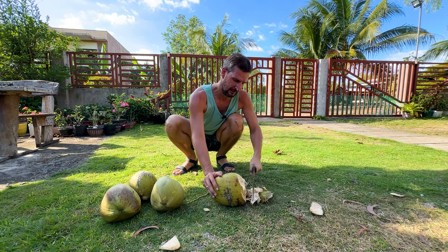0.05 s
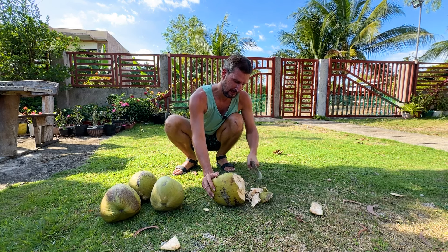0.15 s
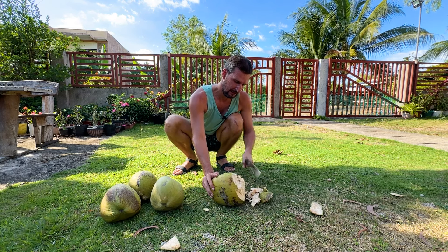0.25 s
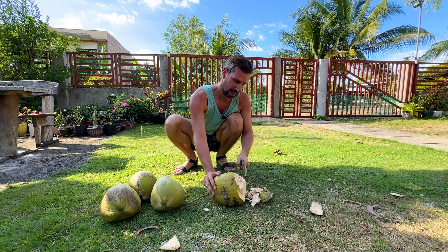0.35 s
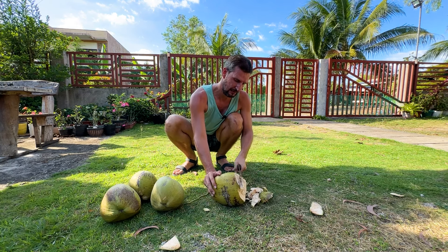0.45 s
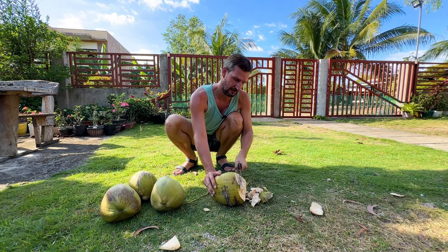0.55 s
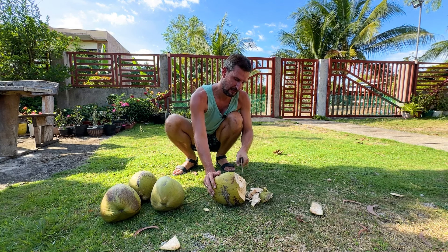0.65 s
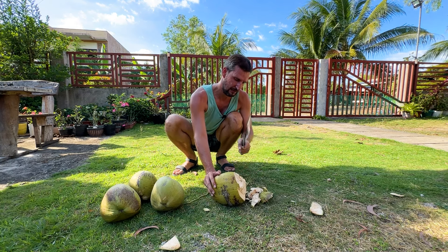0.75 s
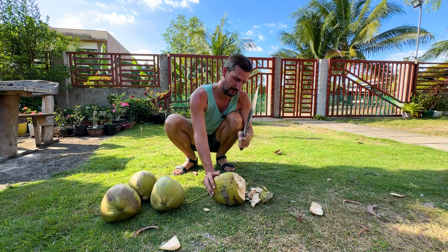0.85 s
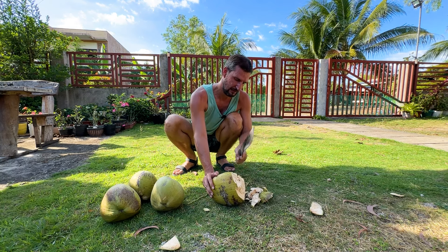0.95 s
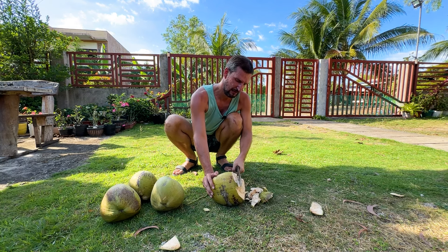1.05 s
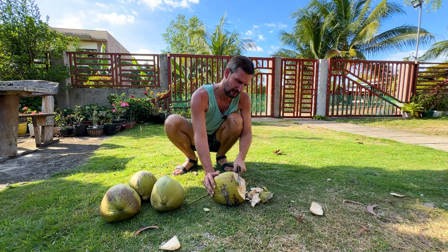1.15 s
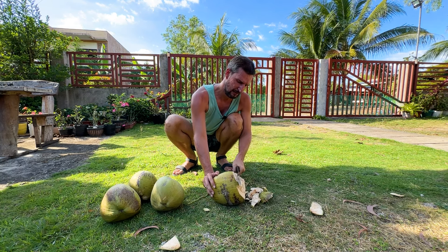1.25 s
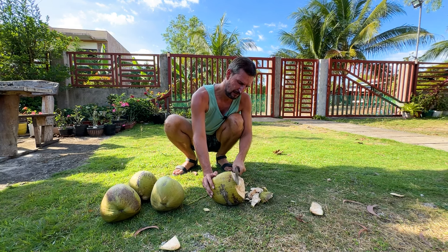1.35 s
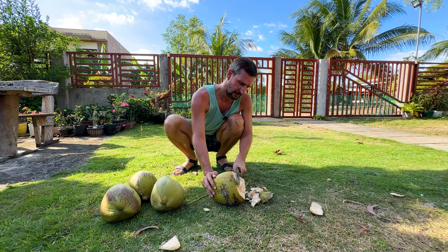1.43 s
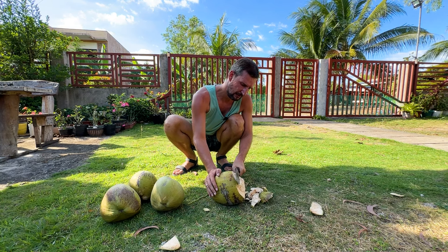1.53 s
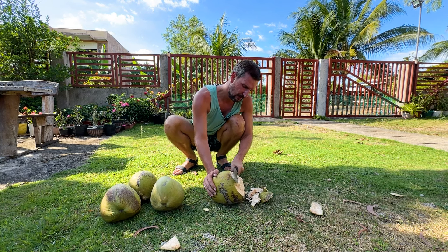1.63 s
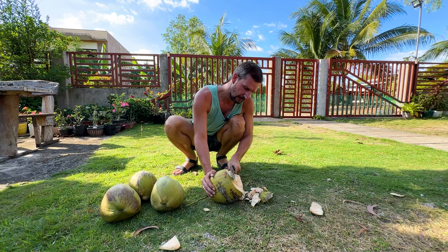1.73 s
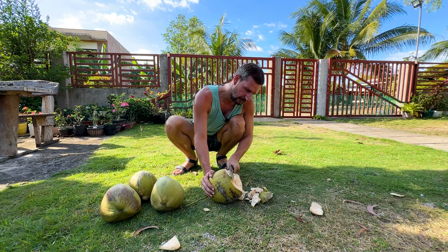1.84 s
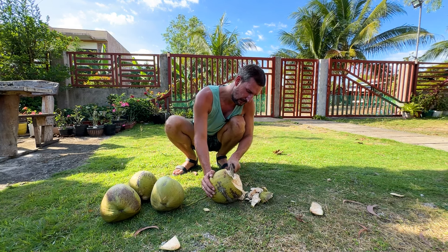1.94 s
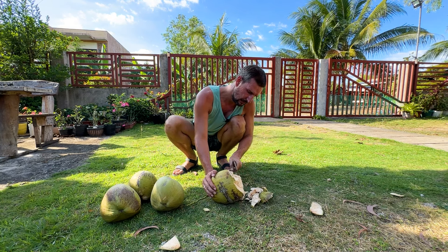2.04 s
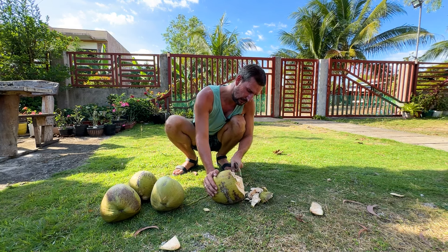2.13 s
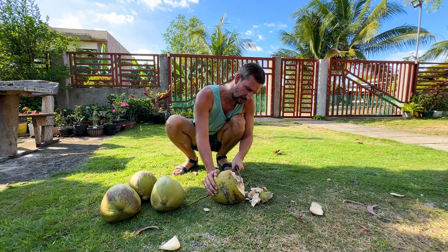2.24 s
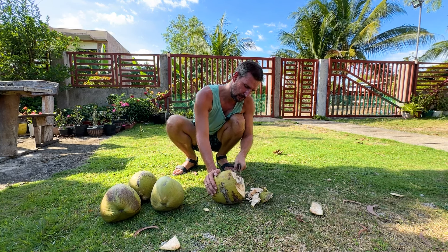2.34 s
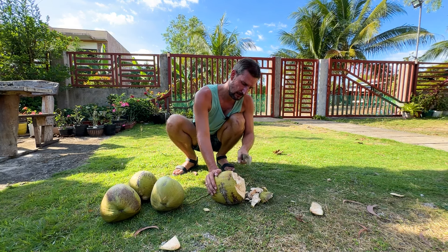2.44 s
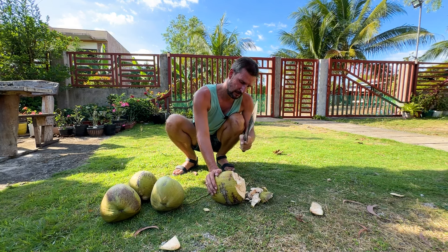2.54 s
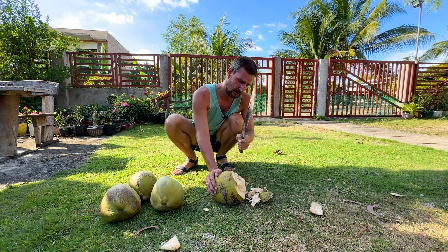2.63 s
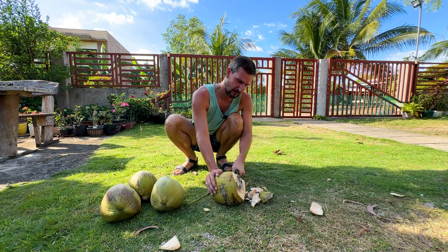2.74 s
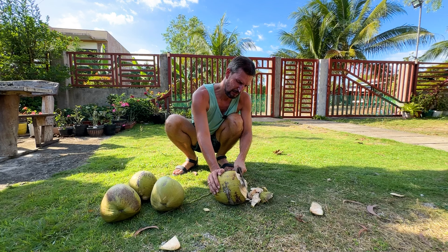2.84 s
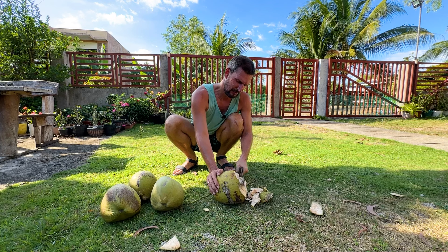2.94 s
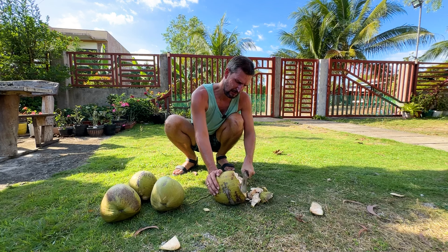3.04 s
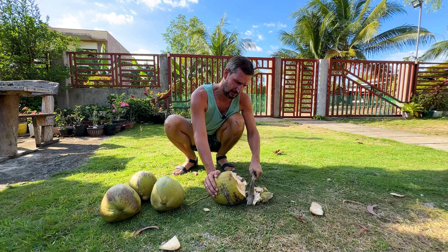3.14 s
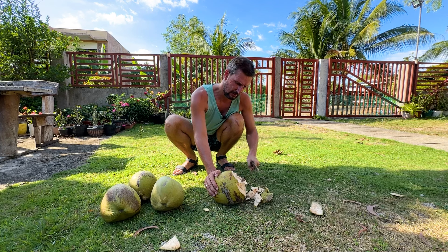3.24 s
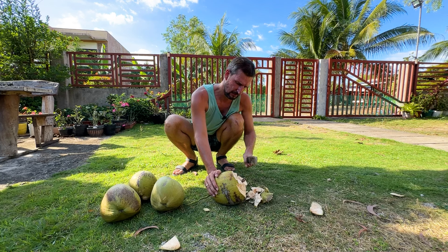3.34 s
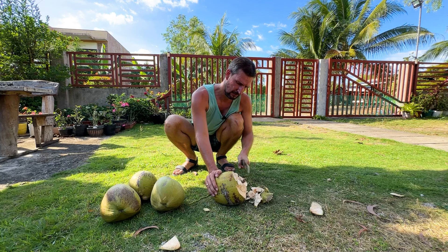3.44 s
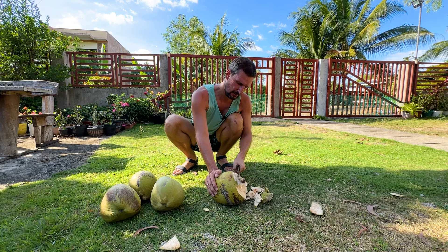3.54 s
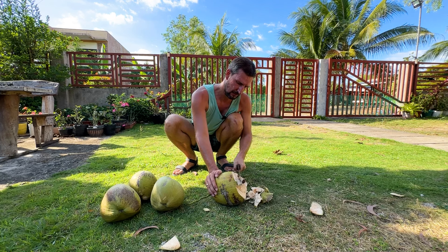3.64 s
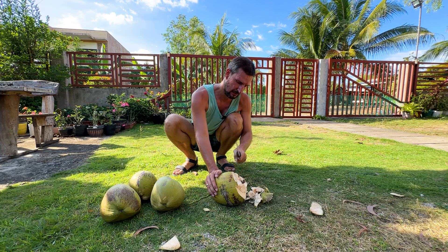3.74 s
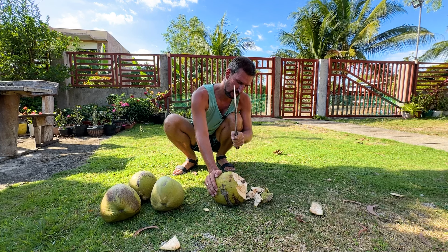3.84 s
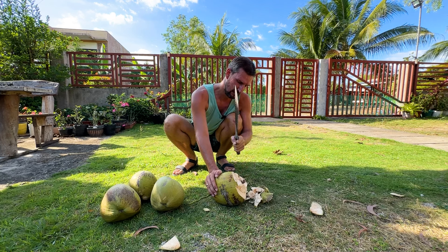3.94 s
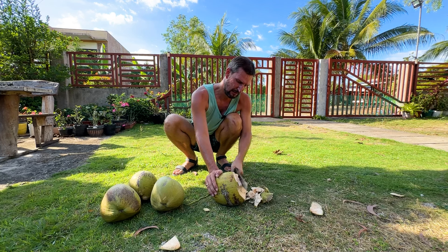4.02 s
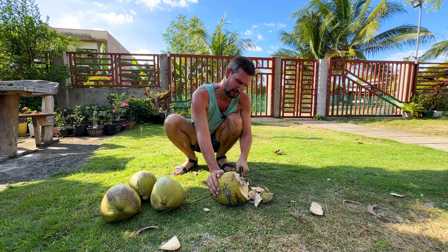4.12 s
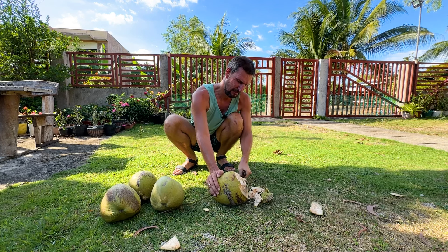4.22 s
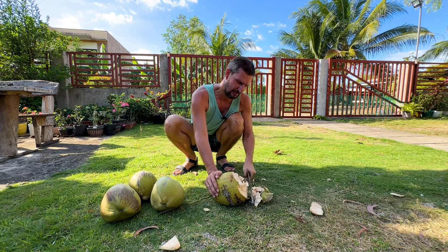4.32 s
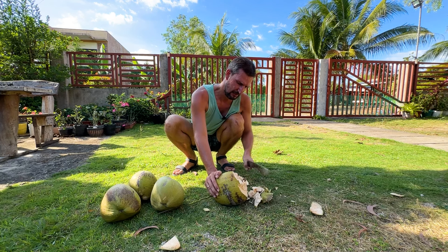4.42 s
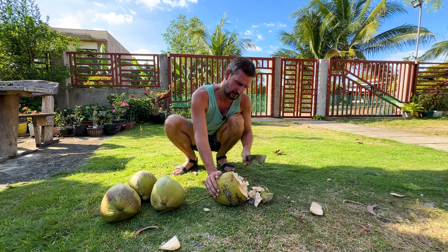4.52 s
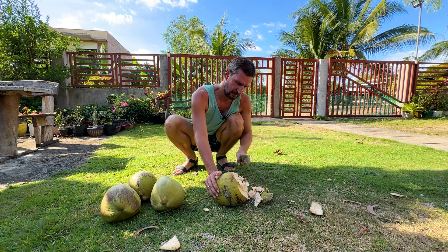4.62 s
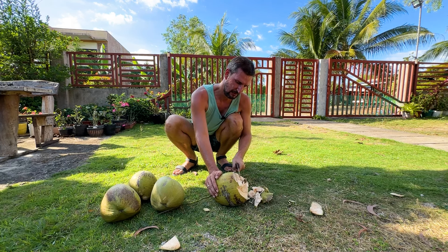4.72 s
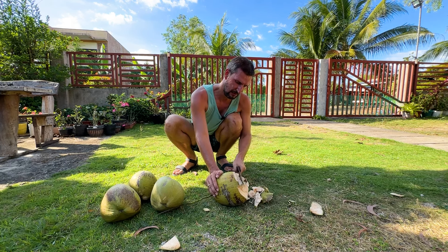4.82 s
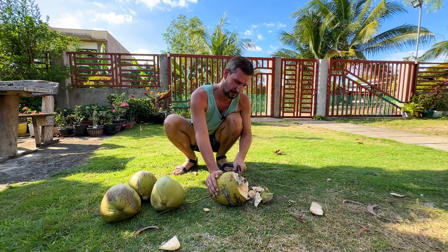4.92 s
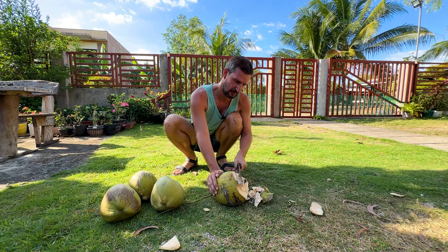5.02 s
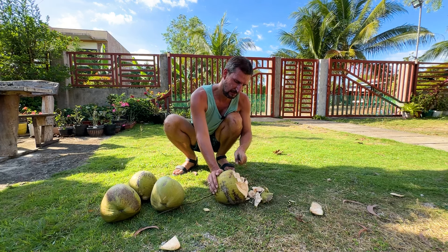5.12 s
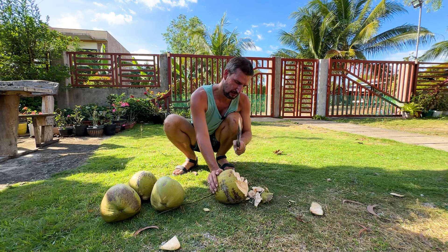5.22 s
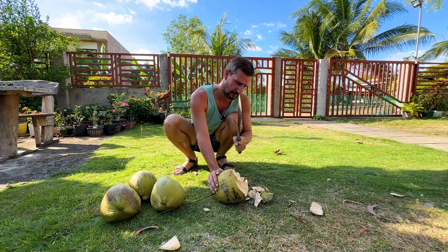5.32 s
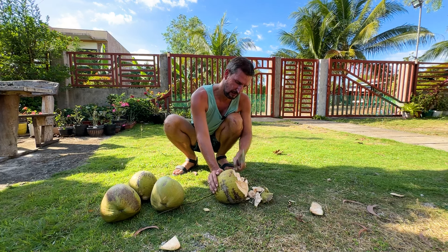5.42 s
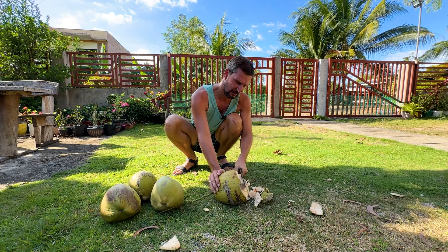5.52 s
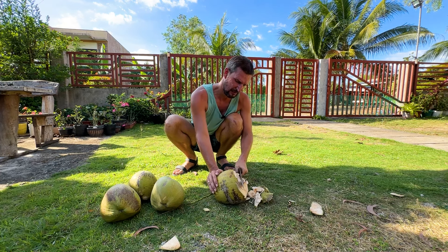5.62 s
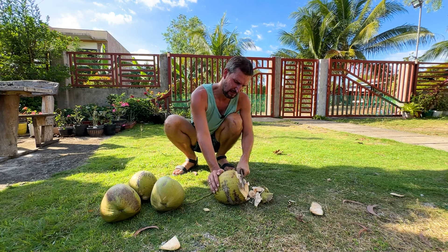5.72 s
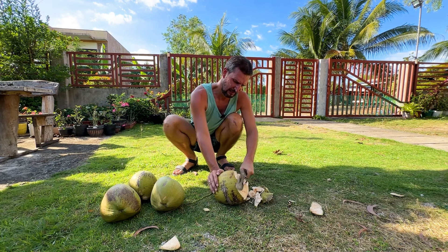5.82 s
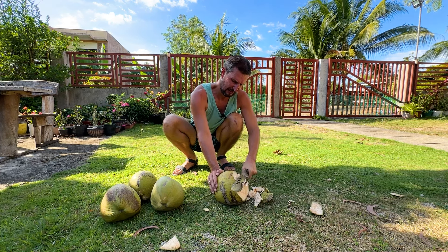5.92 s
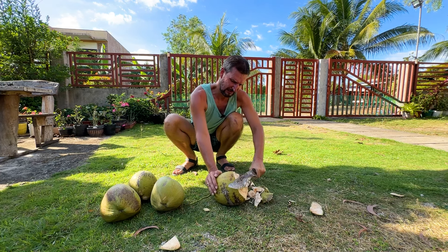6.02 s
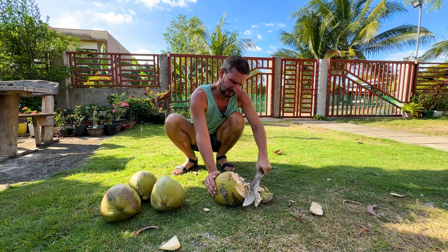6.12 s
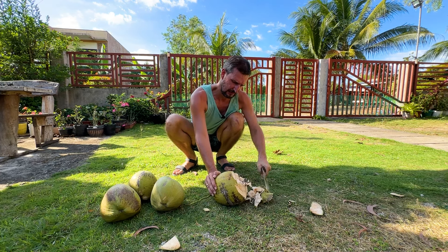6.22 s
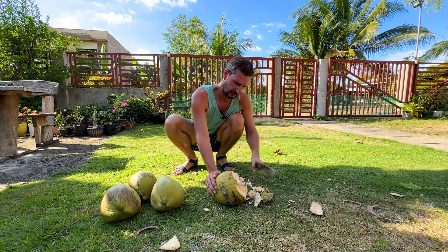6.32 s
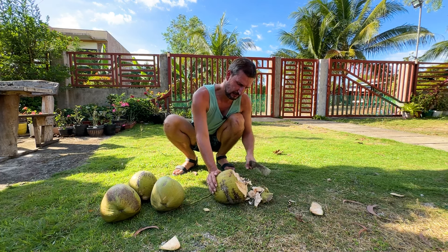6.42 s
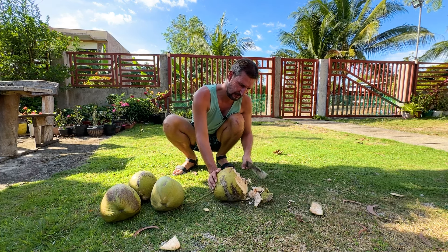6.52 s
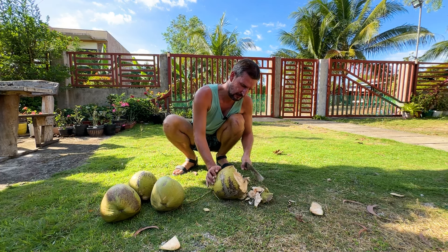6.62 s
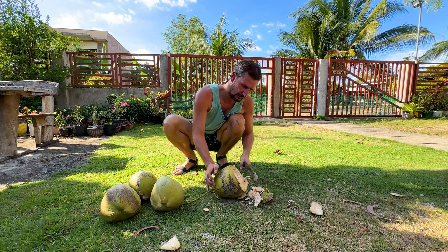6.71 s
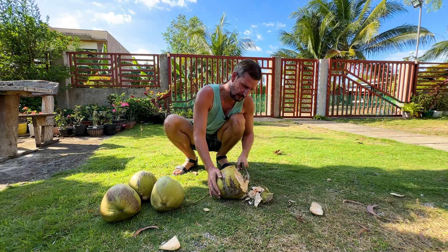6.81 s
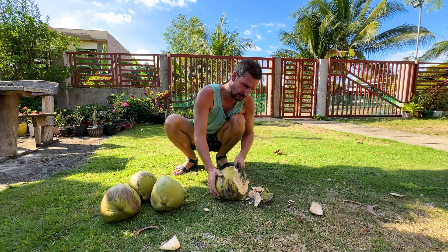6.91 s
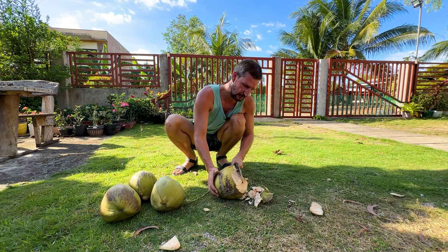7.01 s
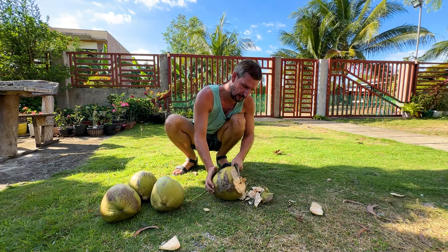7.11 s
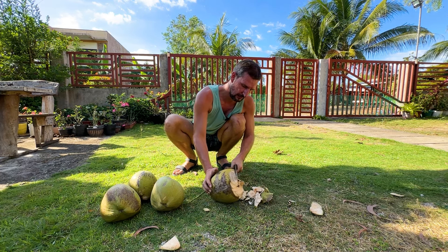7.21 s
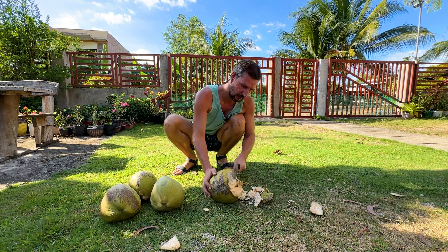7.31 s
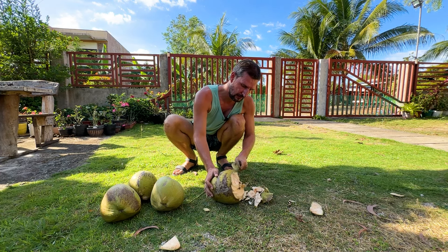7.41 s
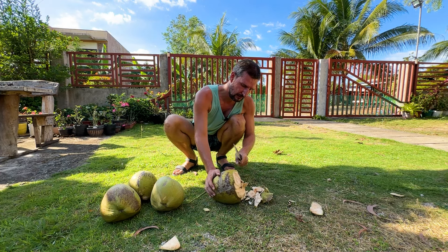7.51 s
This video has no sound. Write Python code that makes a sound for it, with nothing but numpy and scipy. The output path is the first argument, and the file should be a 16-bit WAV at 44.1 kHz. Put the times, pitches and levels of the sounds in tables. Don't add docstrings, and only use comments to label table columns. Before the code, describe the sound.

A heavy knife chops a green coconut outdoors in sharp, irregular blows, with wet fibre crunches, scrapes and a bright husk-splitting crack, over faint birds.

```python
import sys
import numpy as np
from scipy import signal
from scipy.fft import rfft, irfft
from scipy.io import wavfile
from scipy.ndimage import uniform_filter1d

SR = 44100
rng = np.random.default_rng(int(sys.argv[2]) if len(sys.argv) > 2 else 0)


def wrap_up_sound(samples):
    columns = np.atleast_2d(samples).T
    tamed = np.clip(columns, -1, 1)
    steps = np.round(tamed * 32767).astype(np.int16)
    wavfile.write(sys.argv[1], SR, steps)


def magnitude_from_level(level_db):
    exponent = np.asarray(level_db, float) / 20
    return 10 ** exponent


N = 333396


def unit(x):
    return x / np.sqrt(np.mean(x ** 2))


def colour(x, points):
    hz, db = np.transpose(points)
    f = np.arange(len(x) // 2 + 1) * SR / len(x) + 1
    gain = magnitude_from_level(np.interp(np.log(f), np.log(hz), db))
    return irfft(rfft(x) * gain, len(x))


def ring(modes, size, chance=0):
    hz, db, t60 = np.transpose(modes)[:, :, None]
    t = np.arange(size) / SR
    level_chance, pitch_chance = chance + np.zeros((2, len(modes), 1))
    decay = magnitude_from_level(db + 2 * level_chance - 60 * t / t60)
    return np.sum(decay * np.sin(2 * np.pi * hz * (1 + .012 * pitch_chance) * t), axis=0)


def ruptures(size, spread_db):
    sizes = np.minimum(rng.exponential(size=size), 6.5)
    return rng.standard_normal(size) * magnitude_from_level(spread_db * sizes)


def walk(rate):
    k = int(SR / rate)
    steps = np.repeat(rng.standard_normal(N // k + 1), k)
    return 1.1 * uniform_filter1d(uniform_filter1d(steps, k), k)[:N]


def add(out, s, x):
    i = int(s * SR)
    x = x[max(-i, 0):N - i]
    out[max(i, 0):max(i, 0) + len(x)] += x


# f/Hz, level/dB [per Hz]
FLOOR_TONE = [(12, -37), (20, -2), (101, -3.5), (123, -7), (187, -6), (215, -14), (284, -11), (375, -12),
              (408, -9), (525, -13), (797, -12.5), (867, -17), (1250, -20), (2370, -26), (15800, -38.5)]
FLOOR_DB = -56.5
# f/Hz, width/Hz, level/dB
HUMS = [
    (98, 8, -65),
    (405, 10, -71.5),
    (460, 10, -71),
    (5000, 150, -82),
    (14300, 2600, -74),
]


def neighbourhood():
    out = 0
    for hz in 30 * 2 ** np.arange(10):
        octave = [(hz / 2, -20), (hz / 1.3, 0), (hz * 1.3, 0), (hz * 2, -20)]
        band = colour(rng.standard_normal(N), octave)
        out = out + band * magnitude_from_level(.8 * walk(3) + 1.2 * walk(20))
    out = magnitude_from_level(FLOOR_DB) * unit(colour(out, FLOOR_TONE))
    for hz, wide, db in HUMS:
        line = colour(rng.standard_normal(N), [(hz - 3 * wide, -50), (hz, 0), (hz + 3 * wide, -50)])
        out = out + magnitude_from_level(db + 1.5 * walk(4)) * unit(line)
    return out


# t/s, length/s, f/Hz, glide/Hz, level/dB
BIRDS = [(.14, .16, 3550, -100, -75.5), (.76, .03, 4350, 0, -75), (.81, .045, 4350, 0, -76),
         (.8, .15, 7400, 0, -78), (.955, .09, 3530, 0, -75), (1.195, .04, 2900, 0, -72),
         (7.09, .05, 4600, 0, -72), (3.28, .13, 2930, 0, -70), (3.92, .08, 3700, 0, -79),
         (4.56, .2, 3500, -60, -74.5), (4.88, .1, 4600, 0, -76), (6.3, .08, 4200, 0, -77),
         (7.35, .27, 5560, 60, -69), (7.36, .2, 5800, -100, -74), (7.47, .15, 5300, -150, -73)]


def birds():
    out = np.zeros(N)
    flutter = magnitude_from_level(4 * walk(90))
    waver = np.cumsum(.012 * walk(400)) / SR
    for s, length, hz, glide_hz, db in BIRDS:
        t = np.arange(int(length * SR)) / SR
        cycles = hz * (t + waver[:len(t)]) + glide_hz * t ** 2 / (2 * length)
        swell = np.sqrt(np.sin(np.pi * t / length))
        add(out, s, magnitude_from_level(db + 4.5) * swell * np.sin(2 * np.pi * cycles))
        waver = np.roll(waver, -len(t))
    return out * flutter


# f/Hz, echo level/dB, t60/s
YARD = [
    (150, -30, .25),
    (500, -25, .24),
    (1200, -25, .22),
    (2500, -25, .22),
    (5000, -24, .2),
    (11000, -21, .18),
]


def yard(x):
    t, out = np.arange(22000) / SR, 0
    for hz, db, t60 in YARD:
        band = [(hz / 3, -30), (hz, 0), (hz * 3, -30)]
        decay = magnitude_from_level(-120 * t / t60) * np.clip(t / 0.0036, 0, 1) * 14 / (SR * t60)
        power = signal.fftconvolve(colour(x, band) ** 2, decay)[:N]
        wash = unit(colour(ruptures(N, 2.2) * magnitude_from_level(1.5 * walk(150)), band))
        out = out + magnitude_from_level(db) * np.sqrt(np.abs(power)) * wash
    return out


def single_rings(table, soft_s):
    out = np.zeros(N)
    for s, db, hz, t60 in table:
        t = np.arange(int(t60 * SR)) / SR
        rung = ring([(hz, db - 3.5, t60)], len(t)) * (1 - np.exp(-t / soft_s))
        rumble_cut = signal.butter(2, hz / 2, "high", fs=SR, output="sos")
        add(out, s, signal.sosfilt(rumble_cut, rung))
    return out


# t/s, level/dB, f/Hz, t60/s
BUMPS = [
    (1.046, -21.5, 64.6, 0.15),
    (2.781, -13, 81.4, 0.14),
    (4.066, -15, 68.75, 0.15),
    (5.494, -26, 80, 0.17),
]
# t/s, level/dB, f/Hz, t60/s
ROCKS = [
    (.036, -31, 430, 0.02),
    (1.049, -16.5, 125.6, 0.072),
    (3.134, -21, 218, 0.043),
    (3.587, -26, 251, 0.033),
    (4.066, -13, 135, .06),
    (4.316, -16.5, 217, 0.018),
    (5.9215, -2.5, 2523, 0.018),
    (5.978, -1, 2600, .03),
    (6.022, -10, 2461, .025),
]


def nut_jolts():
    return single_rings(BUMPS + ROCKS, soft_s=0.00075)


# t/s, level/dB, f/Hz, t60/s
RINGS = [(.492, -31, 6300, 0.11), (.503, -36.5, 5400, 0.1), (6.949, -38, 674, 0.068),
         (7.13, -38, 850, 0.052), (2.79, -38, 5410, .1), (2.79, -36.5, 5800, .12),
         (3.112, -45.5, 6280, 0.33), (1.052, -28, 6430, .06), (1.052, -30, 5405, .04),
         (1.06, -38, 6600, .12), (5.5, -35.5, 4900, .15), (3.59, -47.5, 5400, .08), (6.14, -54, 6400, 0.28),
         (3.659, -51, 5400, 0.1), (3.659, -49, 6450, .05), (4.2, -44, 6440, 0.043), (4.075, -42, 6330, .15),
         (4.27, -47.5, 6550, 0.23), (6.079, -23.5, 7990, 0.066), (6.082, -26, 6340, 0.064),
         (6.076, -18.5, 698, 0.065), (6.842, -52, 6410, 0.2), (6.951, -46, 6430, .08)]


def blade_rings():
    return single_rings(RINGS, soft_s=.001)


# t/s, level/dB, f/Hz, t60/s
PLATES = [(.4905, -24, 620, .04), (.491, -26, 1150, .02), (.4908, -21, 900, .016), (.4912, -29, 1450, .015),
          (.036, -44, 850, .02), (.4915, -26, 1900, .022), (1.047, -7, 520, .028), (1.048, -14, 1430, .02),
          (1.0495, -8, 2190, .02), (1.0495, -16, 2630, .025), (1.048, -13, 1700, .025),
          (2.2362, -36, 4400, .012), (2.231, -19, 14400, .008), (2.2365, -28, 13900, .008),
          (2.782, -7, 2320, .03), (2.7845, -6, 3050, .024), (2.784, -17, 3970, .025),
          (2.783, -16, 620, .05), (3.5945, -31, 520, 0.04), (3.659, -31, 1750, .016),
          (3.6585, -24, 540, .011), (3.659, -31, 2350, .01), (3.6595, -29, 1300, .012),
          (3.662, -40, 920, .04), (.4965, -17, 920, .018), (.4915, -36, 4300, .02),
          (1.0478, -15, 8600, .028), (1.0475, -14, 13300, .012), (5.499, -12, 850, .04),
          (5.499, -22, 3950, .016), (1.518, -45, 2200, .015), (4.0665, -5, 2325, .02),
          (4.0655, -1.5, 430, .035), (4.067, -16, 1700, .025), (5.4945, -8, 1950, .03),
          (5.496, -8, 1500, .024), (5.4955, -8, 1120, .03), (5.4935, -9, 360, .03),
          (5.978, -12, 11750, .02), (5.988, -25, 13500, .01)]


def husk_plates():
    return magnitude_from_level(8.0) * single_rings(PLATES, soft_s=.0012)


# t/s, level/dB, f/Hz
SPLINTERS = [(0.5044, -33, 800), (0.5153, -42, 775), (1.0641, -31, 6720), (1.0666, -29, 1900),
             (1.0679, -27, 860), (1.0756, -33, 8530), (1.0775, -30, 1830), (1.086, -36, 1980),
             (1.0905, -36, 8610), (1.091, -34, 2150), (1.099, -34.5, 1980), (2.8006, -28.5, 5430),
             (2.8036, -32, 6290), (2.8096, -34, 5340), (2.8146, -35, 6460), (2.8171, -30, 2050),
             (2.8251, -30, 2860), (4.0787, -27, 11970), (4.0812, -31, 6290), (4.0822, -31.5, 12920),
             (4.0865, -27, 1720), (4.0937, -28, 8960), (4.0942, -32, 11890), (4.096, -27, 1720),
             (4.1087, -31, 9100), (4.1103, -32, 1720), (4.1511, -31, 11020), (4.1516, -34, 8610),
             (4.2084, -35, 1460), (5.5095, -36, 7150), (5.5205, -26.5, 1970), (5.5474, -37.5, 860),
             (5.9932, -14.5, 2440), (6.0203, -17, 11280), (6.0203, -15, 9060), (6.0208, -11, 7750),
             (6.0208, -9, 5900), (6.0208, -8, 6720), (6.0215, -17, 4800), (6.0213, -15, 11970),
             (6.021, -15, 3180), (6.0218, -5, 2360), (6.0223, -16, 1480), (6.0363, -21, 2240),
             (2.9722, -42, 2360), (3.0246, -38, 10770), (3.0261, -31, 8800), (3.0266, -43, 2060),
        (3.0371, -42, 2070), (3.061, -38, 2150), (3.069, -37, 2220), (3.083, -38, 8870),
        (3.1074, -39.5, 1980), (3.1074, -34, 9470), (3.1369, -32, 9470), (3.1369, -35, 11800),
        (3.1385, -27, 8440), (4.2962, -34, 11280), (4.305, -45, 1210), (4.7986, -43, 1460),
        (4.8091, -44.5, 10540), (4.8099, -41.5, 945), (4.8101, -39, 1547), (6.9487, -42, 8790),
        (6.9497, -42, 6670), (7.036, -39, 10590), (7.036, -38, 3190), (7.036, -40, 2350),
        (7.0365, -36, 1380), (7.0378, -37, 8100), (7.049, -37, 8270), (7.05, -36.5, 1390),
        (7.0515, -41, 2310), (7.0595, -40, 10590), (7.0659, -42, 1980), (7.1373, -43, 790),
        (2.2309, -40, 8100), (2.2309, -39, 7060), (2.2309, -37, 3750), (1.3578, -26, 4690),
        (1.3579, -23, 12830), (1.3589, -28, 6550), (1.3589, -27, 7060), (1.359, -24, 8350),
        (4.8165, -43, 5900), (4.8165, -40, 14500), (4.8165, -43, 1950), (4.8085, -41, 14400),
        (5.6923, -32, 11300), (5.9213, -17, 5900), (5.9213, -19, 3600), (5.977, -12, 2950),
        (1.9325, -42, 7200), (1.9325, -41, 14000)]


def snaps():
    rows = [(s, db + 11, hz, .011 + 13 / hz) for s, db, hz in SPLINTERS]
    return single_rings(rows, soft_s=.0005)


# t/s, length/s, slip rate f/Hz, level/dB
SQUEAK = (5.807, .027, 482, -41)
SLIP_DB = [-4, 0, -4, -12, -22, -22, -24, -24, -19, -18, -24, -24, -26, -24, -26, -24, -25, -27]


def squeak():
    s, length, hz, db = SQUEAK
    out, t = np.zeros(N), np.arange(int(length * SR)) / SR
    slips = sum(magnitude_from_level(d) * np.sin(2 * np.pi * (k + 1) * hz * t) for k, d in enumerate(SLIP_DB))
    swell = np.sqrt(np.sin(np.pi * t / length)) * (.7 + .7 * t / length)
    add(out, s, magnitude_from_level(db) * unit(slips) * swell)
    return out


# t/s, length/s, f/Hz, level/dB
CHATTER = [(3.035, .08, 5000, -46.5), (3.05, 0.028, 2160, -44.5), (3.06, .06, 8720, -44),
           (4.2, .04, 1500, -44), (4.197, .05, 11820, -42), (7.095, .052, 2700, -52.5),
           (4.887, .023, 2000, -60), (1.06, .045, 1950, -39), (1.055, .05, 6500, -42.5),
           (4.078, .045, 1720, -38), (4.078, .09, 2500, -40.5), (4.185, .015, 4700, -47.5),
           (5.995, .025, 2500, -28.5), (6.66, .08, 8300, -67), (6.975, .05, 2100, -56.5)]


def chatter():
    out = np.zeros(N)
    for s, length, hz, db in CHATTER:
        t = np.arange(int(length * SR)) / SR
        mode = ring([(hz, 0, 30 / hz)], size=1000)
        rung = signal.fftconvolve(ruptures(4000, 3.5), mode)[:len(t)]
        add(out, s, magnitude_from_level(db) * unit(rung) * np.sqrt(np.sin(np.pi * t / length)))
    return out


# t/s, hiss level/dB, fall/dB per s, husk level/dB re hiss, husk f/Hz
CRUNCHES = [
    (.5, -44.5, 237.5, -2.5, 1670),
    (1.06, -28.5, 214.5, -9, 2110),
    (2.8, -27.5, 245.5, -4.5, 2384),
    (4.085, -29.5, 236, -3, 2000),
    (5.51, -32.5, 260, -3, 1830),
    (5.83, -54, 111.5, -7.5, 2170),
]
# t/s, hiss level/dB, fall/dB per s, husk level/dB re hiss, husk f/Hz
TEARS = [
    (1.3605, -35, 520, -14, 2100),
    (2.2275, -47, 450, -12, 3930),
    (2.2365, -48, 1100, -12, 4300),
    (3.145, -53, 213, -19.5, 2610),
    (5.695, -48.5, 798, -13.5, 1970),
    (5.925, -45, 299, 0, 2600),
    (5.985, -28.5, 453, -3.5, 2654),
    (6.03, -30, 230, -9.5, 2217),
]
# t/s, hold/s, hiss level/dB, husk level/dB re hiss, husk f/Hz
DRAGS = [(0.03, 0.025, -51, -11, 2280), (2.946, 0.053, -53.5, -12, 2320), (3.029, 0.037, -43.5, -11, 2290),
         (3.073, 0.033, -40, -18, 2200), (3.133, .008, -39, -20, 2600), (4.178, .012, -50, -8, 2043),
         (4.2, .042, -43.5, -9, 1540), (4.279, 0.036, -46, -7.5, 1650), (4.805, .025, -48, -6.5, 1660),
         (4.885, .065, -59.5, -10, 1504), (5.04, .022, -58, -16, 1840), (5.69, .004, -51, -15, 1950),
         (6.021, .006, -26, -7, 2430), (6.328, .4, -66, -3, 1404), (6.826, .06, -56.5, -6.5, 1630),
         (6.89, 0.065, -54, -11.5, 1670), (6.969, 0.045, -59, 1, 1562), (7.033, .02, -43.5, -4.5, 1450),
         (7.06, .08, -49, -9.5, 1460), (7.161, .055, -61, -13.5, 1658), (7.239, .05, -70.5, -7.5, 1660),
         (4.329, 0.027, -56.5, -10, 1620), (3.593, .011, -47.5, -20, 2500), (5.785, .015, -62, -19, 2000),
         (6.085, 0.07, -44, -16.5, 2300), (2.995, .008, -54.5, -15, 2300), (5.916, .003, -46, -11, 3000)]


def rubbing():
    t = np.arange(N) / SR
    close_db_s, stop_db_s, settle_db = 4000, 600, 31
    for table, shell_db in (CRUNCHES, -3), (TEARS, -19.5):
        for s, db, fall, husk_db, husk_hz in table:
            late = np.maximum(t - s, 0)
            ends = np.minimum(t - s, 0) * close_db_s - stop_db_s * np.maximum(late - settle_db / fall, 0)
            burst = 6 * np.exp(-late / 0.0037)
            yield db + burst - fall * late + ends, husk_db, husk_hz, shell_db, False
    rise_db_s, fall_db_s = 1100, 600
    for s, hold, db, husk_db, husk_hz in DRAGS:
        edges = rise_db_s * np.maximum(s - t, 0) + fall_db_s * np.maximum(t - s - hold, 0)
        yield db - edges, husk_db, husk_hz, -19, True


# f/Hz, level/dB, t60/s
HOLLOW = [
    (417, -1.5, 0.024),
    (462, 1, 0.02),
]
# f/Hz, level/dB, t60/s
SHELL = [
    (625, 5, 0.039),
    (790, -4, 0.038),
    (894, 3, 0.039),
    (960, -9, 0.0033),
]
# f/Hz, level/dB, t60/s
HUSK = [(1254, -3.5, 0.042), (1480, 4, 0.0066), (1725, -3.5, 0.015), (2000, -4.5, 0.014),
        (2280, 1.5, 0.011), (2630, -4.5, 0.0073), (3030, -10.5, 0.018), (3950, -10.5, 0.0057),
        (5120, -12, .012)]
# f/Hz, level/dB [per Hz]
FIBRE = [(1500, -44), (3500, -13.0), (4030, -7.0), (5010, -8.5), (5840, -6.5), (6410, -4.5), (7570, -9.5),
         (8510, -3.5), (10400, -6.5), (11400, -1.5), (12300, -6.5), (14500, 0.0), (15300, -7.0)]
# f/Hz, level/dB
DRAG_TONE = [
    (4000, -7),
    (7000, -5.5),
    (9000, 0),
]


def scrapes():
    grip = magnitude_from_level(2.2 * walk(150))
    hiss = 0
    for hz in 4000 * 2 ** np.arange(0, 2.1, 1 / 3):
        band = [(hz / 1.4, -25), (hz, 0), (hz * 1.4, -25)]
        patch = unit(colour(grip * ruptures(N, 3.2), band))
        hiss = hiss + magnitude_from_level(3.5 * walk(30)) * patch * np.sqrt(hz)
    hiss = unit(colour(hiss, FIBRE))
    thin = unit(colour(hiss, DRAG_TONE))
    slips = grip * ruptures(N, 3.0)
    husk = np.array([unit(signal.fftconvolve(slips, ring([mode], size=2000))[:N]) for mode in HUSK])
    shell = signal.fftconvolve(grip * ruptures(N, 2.4), ring(HOLLOW + SHELL, size=3000))[:N]
    shell = unit(colour(shell, [(150, -20), (400, 0)]))
    out = np.zeros(N)
    for db, husk_db, husk_hz, shell_db, dragged in rubbing():
        on = db > -90
        share = magnitude_from_level(-30 * np.abs(np.log2(np.array(HUSK)[:, :1] / husk_hz)))
        rub = np.sum(share * husk[:, on], axis=0) / np.sqrt(np.sum(share ** 2, axis=0))
        fibres = (thin if dragged else hiss)[on]
        out[on] += magnitude_from_level(db[on]) * (fibres + magnitude_from_level(husk_db) * rub + magnitude_from_level(shell_db) * shell[on])
    return out


def favour(modes, near_hz, db_per_octave):
    return [(hz, db - db_per_octave * abs(np.log2(hz / near_hz)), t60) for hz, db, t60 in modes]


def contact(out, s, ms, crack_db, bodies, slice_s, slice_db, fade, first=3.5, size=6000):
    lead = 256
    t = np.arange(size) / SR - slice_s
    travel = np.where(t > 0, np.exp(-np.maximum(t - ms / 1000, 0) / fade), 0)
    entry = magnitude_from_level(slice_db) * np.clip(.12 + 0.87 * (t / slice_s + 1), 0, 1) * (t <= 0)
    bite = 1 + first * np.exp(-np.abs(t) / .0008)
    fibres = np.array(FIBRE) + [0, 3.0] * rng.standard_normal((len(FIBRE), 2))
    tearing = ruptures(size, 2.5) * (travel * bite / (1 + first / 2) + entry)
    layers = [(colour(np.roll(tearing, lead), fibres), crack_db)]
    push = np.roll(ruptures(size, 3.5) * travel * bite, lead)
    for modes, db in bodies:
        chance = rng.standard_normal((2, len(modes), 1))
        body = signal.fftconvolve(push, ring(modes, size, chance))[:size]
        radiation = signal.butter(4, 0.82 * modes[0][0], "high", fs=SR, output="sos")
        layers.append((signal.sosfilt(radiation, body), db))
    for x, db in layers:
        peak = np.sqrt(uniform_filter1d(x ** 2, size=130).max())
        add(out, s - slice_s - lead / SR, magnitude_from_level(db) * x / peak)


HOLLOW_HZ, SHELL_HZ = 430, 900


def touches(table, knock_hz, ms, trim_db, slice_s, slice_db, fade, focus_db):
    out = np.zeros(N)
    for s, crack_db, *knock_db, husk_db, husk_hz in table:
        bodies = [(favour(HOLLOW + SHELL, knock_hz, 54), db) for db in knock_db]
        bodies.append((favour(HUSK, husk_hz, focus_db), husk_db + 0.5))
        contact(out, s + 0.00088, ms, crack_db + trim_db, bodies, slice_s, slice_db, fade)
    return out


# t/s, fibre crack level/dB, husk level/dB, husk f/Hz
TICKS = [(0.0024, -36.5, -46.5, 4700), (1.1658, -32.5, -88, 1880), (1.6931, -48, -66, 1308),
         (1.932, -31.5, -42, 2195), (1.9536, -42, -62.5, 2244), (2.9698, -35.5, -43, 2360),
         (3.026, -25, -43, 2130), (3.1894, -41.5, -66.5, 1370), (4.3982, -44, -59, 1695),
         (4.458, -49.5, -70.5, 1620), (4.6287, -47.5, -83, 1610), (5.6433, -70, -49.5, 2290),
         (5.6913, -30.5, -51.5, 1760), (5.8512, -47, -47, 2380), (5.8676, -39, -53, 2160),
         (6.1343, -29.5, -48, 2507), (6.2238, -41.5, -63.5, 1270), (6.8384, -33, -57, 1305),
         (6.9276, -35.5, -50, 2090), (7.2193, -43, -61.5, 1280), (7.2619, -55.5, -64, 1210),
         (7.2833, -51, -71, 1300)]
# t/s, fibre crack level/dB, hollow level/dB, husk level/dB, husk f/Hz
HOLLOW_TAPS = [
    (3.1348, -23.5, -38.5, -45.5, 3100),
    (3.5883, -28, -28, -40, 2350),
    (3.6576, -43, -38, -52, 1900),
    (4.1505, -27, -47, -41, 2310),
    (4.2958, -32.5, -52, -67, 1270),
    (5.8251, -21.5, -43, -31.5, 2210),
]
# t/s, fibre crack level/dB, shell level/dB, husk level/dB, husk f/Hz
SHELL_TAPS = [
    (1.5179, -80, -47, -43, 1500),
    (2.2303, -25, -62, -39, 4363),
    (4.7955, -46, -48, -43, 1504),
    (4.809, -30.5, -44, -42, 1414),
    (6.9489, -33, -52, -49, 1720),
    (6.9692, -47, -49, -47, 1420),
    (7.0354, -30.5, -41, -38.5, 1350),
    (7.0495, -33, -51, -41.5, 1280),
]


def taps():
    tap = dict(ms=1.5, trim_db=-7.5, slice_s=0.0046, slice_db=-6, fade=0.0034, focus_db=27.8)
    out = touches(TICKS, None, **tap)
    return out + touches(HOLLOW_TAPS, HOLLOW_HZ, **tap) + touches(SHELL_TAPS, SHELL_HZ, **tap)


# t/s, fibre crack level/dB, knock level/dB, husk level/dB, husk f/Hz
NUDGES = [
    (3.1053, -20.5, -44, -38.5, 2000),
    (4.1784, -29, -56, -44.5, 2178),
    (4.2023, -26.5, -96, -43, 1500),
    (4.243, -26, -46, -40, 1480),
    (5.5194, -21, -35, -33, 2000),
    (6.0786, -16, -31.5, -31, 1480),
    (6.8274, -46, -49.5, -51, 1308),
]
# t/s, fibre crack level/dB, hollow level/dB, husk level/dB, husk f/Hz
HOLLOW_NUDGES = [
    (2.8174, -22, -26.5, -27.5, 2020),
    (4.3044, -41, -43, -44.5, 1250),
]


def nudges():
    nudge = dict(ms=2.5, trim_db=-14, slice_s=.003, slice_db=-4.5, fade=.003, focus_db=21)
    return touches(NUDGES, SHELL_HZ, **nudge) + touches(HOLLOW_NUDGES, HOLLOW_HZ, **nudge)


# t/s, fibre crack level/dB, shell level/dB, husk level/dB, husk f/Hz
SPLITS = [
    (1.3576, -10, -35, -28, 1850),
    (5.9204, -8, -46, -14.5, 2640),
    (5.976, -1, -14, -1, 2500),
    (5.9934, -8.5, -44, -17.5, 2630),
    (6.0202, 2, -24, -6, 2400),
    (6.0364, -15, -34, -28.5, 2490),
]


def splits():
    return touches(SPLITS, SHELL_HZ, ms=1.3, trim_db=-7, slice_s=0.0046, slice_db=-11, fade=0.0029, focus_db=39.97)


# t/s, fibre crack level/dB, hollow level/dB, shell level/dB, husk level/dB
CHOPS = [
    (0.4907, -15, -33, -28, -30),
    (1.0459, 3, -13, -7, -9),
    (2.781, 5, -13, -11, -14),
    (2.79, -6, -32, -15, -25),
    (4.0642, 1, -16, -10, -10),
    (5.494, -1, -12.5, -14, -14),
]


def chops():
    out = np.zeros(N)
    for s, crack_db, hollow_db, shell_db, husk_db in CHOPS:
        husk = favour(HUSK, 2290, 6.5)
        bodies = (HOLLOW, hollow_db + 5), (SHELL, shell_db + 0.5), (husk, husk_db + 3.0)
        contact(out, s + 0.00053, 4.2, crack_db - 7, bodies, slice_s=.0036, slice_db=-7.0, fade=.0032, first=.3)
    return out


def scene():
    knife = chops() + splits() + taps() + nudges()
    knife = knife + nut_jolts() + blade_rings() + husk_plates()
    knife = knife + scrapes() + squeak() + chatter() + snaps()
    return (knife + yard(knife) + birds() + neighbourhood())[None]


def roll_off(x):
    return signal.sosfilt(signal.butter(12, 15970, fs=SR, output="sos"), x)


def record(dry):
    clipped = np.clip(dry, -1, 1)
    top_hz = 15960
    mix = colour(clipped[0], [(top_hz - 250, 0), (top_hz + 100, -40)])[None]
    return roll_off(mix)


dry = scene()
out = record(dry)
wrap_up_sound(out)
```